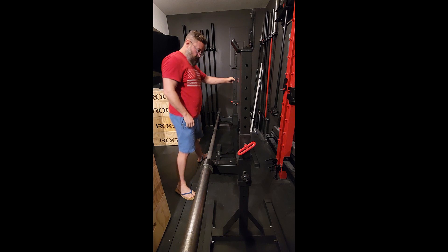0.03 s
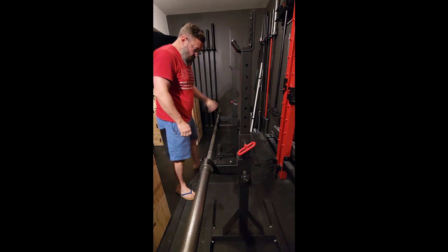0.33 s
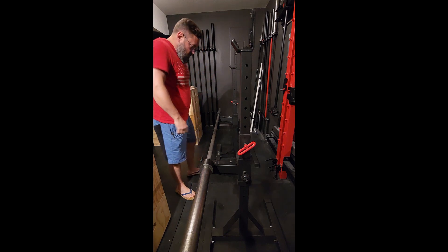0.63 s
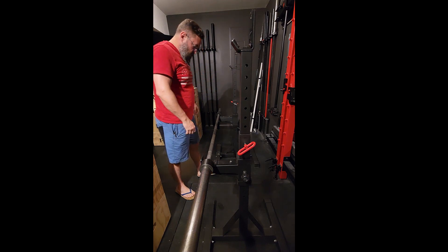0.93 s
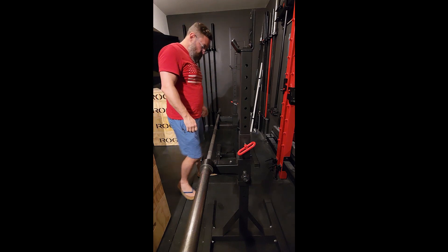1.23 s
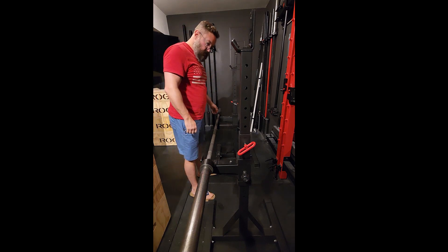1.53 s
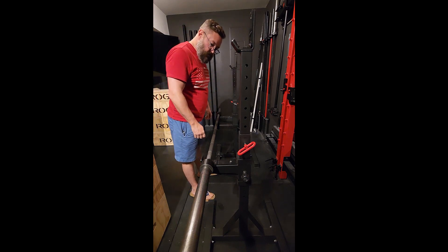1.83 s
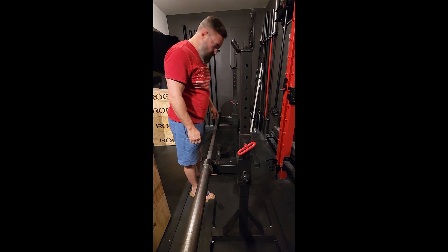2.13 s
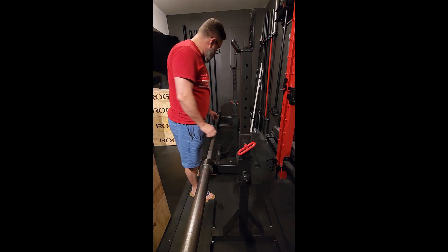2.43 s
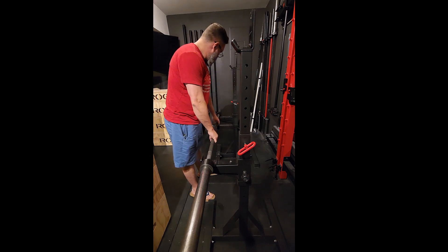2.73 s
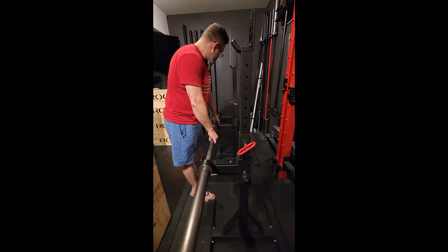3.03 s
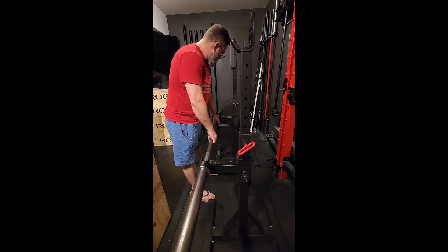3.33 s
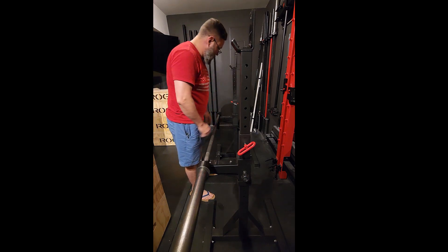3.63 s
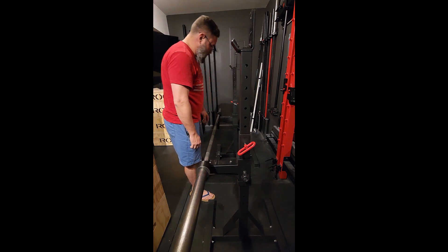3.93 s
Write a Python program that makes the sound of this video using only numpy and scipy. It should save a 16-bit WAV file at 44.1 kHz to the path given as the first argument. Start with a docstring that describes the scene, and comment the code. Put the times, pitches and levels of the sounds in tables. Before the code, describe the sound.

A few steps in flip-flops thud softly across a small gym room, then one sole claps down near the microphone with a hollow pop. Afterwards clothes rustle faintly and a hand barely brushes a barbell, while ventilation hums throughout.

```python
"""Flip-flops in a home gym

A few steps on rubber mats in a small, hard-walled room. The soles pad, scuff and squeak faintly, and the
floor thuds under the weight. One lands flat, a little right of the microphones: trapped air pops, the
edge cracks and the walls answer. Clothes rustle and a hand brushes the barbell.
Ventilation hums and rumbles in the background throughout."""
import sys
import numpy as np
from scipy import signal
from scipy.fft import rfft, irfft
from scipy.io import wavfile

SR = 44100
rng = np.random.default_rng(int(sys.argv[2]) if len(sys.argv) > 2 else 0)


def store_pcm(level_fs):
    """Save levels as 16-bit WAV."""
    pcm = np.round(np.clip(level_fs, -1, 1) * 32767).astype(np.int16)
    wavfile.write(sys.argv[1], SR, np.atleast_2d(pcm).T)


N = 176400
T = np.arange(N) / SR

# Likeness of the left and right microphones in the room: frequency_hz, correlation
STEREO_LIKENESS = [(60, 0.99), (130, 0.95), (290, 0.8), (600, 0.47), (1100, 0), (3000, 0.018), (15000, 0)]
# Decay of the room: frequency_hz, t60_s
ROOM_DECAY = [(100, 0.17), (400, 0.38), (1000, 0.53), (2500, 0.4), (6000, 0.49), (14000, 0.27)]
# Standing waves between the walls: pitch_hz, level_db, t60_s
ROOM_MODES = [(398, -29.5, 0.3), (473, -27, 0.33), (594, -30, 0.35), (678, -34, 0.31), (774, -45, 0.35),
              (804, -45, 0.33), (1151, -37, 0.25), (1281, -39, 0.31)]
ROOM_GAP_S, ROOM_BUILD_S = 0.0069, 0.0017

# Spectrum of the ventilation's air hiss: frequency_hz, relative_db
AIR_COLOUR = [(100, -11.5), (160, -5.5), (190, -9.5), (240, -5), (290, -6.5), (350, -10.5), (555, -12.5),
              (740, -17.5), (950, -17.5), (1350, -16), (2160, -20), (2930, -26.5), (4100, -30),
              (5200, -36.5), (6900, -40.5), (7350, -38.5), (8400, -42.5), (9950, -50), (10750, -44.5),
              (11500, -49.5), (13000, -50.5), (15500, -53)]
# Spectrum of the duct rumble: frequency_hz, relative_db
RUMBLE_COLOUR = [(15, -29), (25, -10), (36, -1), (50, 8.5), (67, 4.5), (80, 6), (92, -1.5), (110, -2),
                 (140, -2), (175, -12.5), (260, -70), (1000, -100)]
# Motor tones: pitch_hz, level_db, waver_share
MOTOR_TONES = [(119.63, -42.5, 0.26), (68.33, -42, 0.75), (221.2, -55.5, 1), (261.5, -54, 0.79),
               (487.6, -61.5, 0.98), (1295, -64.5, 0.89)]

# Touches of the hand on the barbell: start_s, level_db
BAR_TOUCHES = [(2.92, -66), (3.52, -69)]
# Brushes of cloth: start_s, length_s, level_db
RUSTLES = [(0.027, 0.35, -63), (0.245, 0.16, -56.5), (0.336, 0.28, -56.5), (0.944, 0.044, -63),
           (1.364, 0.17, -64.5), (2.837, 0.077, -63.5), (2.94, 0.13, -64.5), (3.208, .17, -65.5),
           (3.477, 0.12, -69), (3.904, 0.089, -62)]
# Spectrum of the cloth: frequency_hz, relative_db
CLOTH_COLOUR = [(300, -17), (1500, 6.5), (4000, -2.5), (8000, -9.5), (11000, -16.5), (15000, -17)]

# Rubber squeaks underfoot: start_s, length_s, level_db, pitch_hz
SQUEAKS = [(0.252, 0.035, -45.5, 2120), (0.373, 0.017, -43.5, 2570), (0.406, 0.06, -53, 2560),
           (0.49, 0.052, -55, 2570), (0.604, 0.028, -44, 2260), (1.065, 0.022, -42, 2550)]
# Weight coming onto the floor: start_s, level_db
THUDS = [(0.305, -27), (0.699, -24.5), (1.121, -34), (1.609, -27), (1.952, -33)]
# Drags of a sole over the mat: start_s, length_s, level_db, swell_db, cutoff_hz
SCUFFS = [(0.001, 0.0275, -50, -4, 4140), (0.594, 0.074, -50, 10.5, 14000),
          (1.603, 0.034, -49.5, 8.5, 9100)]
# Spectrum of the dragging: frequency_hz, relative_db
SCUFF_COLOUR = [(200, -21), (500, 0), (1000, -6), (2200, 3), (2700, -2.5), (3300, 0), (4400, -2),
                (5200, -9), (6300, -4.5), (7800, -4.5), (9500, -10), (15000, -9.5)]
# Soft sole contacts: start_s, level_db, fall_s, cutoff_hz, tap_over_puff_db, rise_s
PADS = [(0.001, -33, 0.01, 3950, 15, 0.0013), (0.228, -31.5, 0.0061, 1950, 12, 0.00085),
        (0.264, -40, 0.013, 2400, 9, .003), (0.304, -38.5, 0.0044, 1490, 14, 0.00086),
        (0.32, -36.5, 0.0033, 1800, 18, 0.0009), (0.368, -44.5, 0.017, 2240, 12, .003),
        (0.455, -43.5, 0.031, 2620, 12, 0.0022), (1.053, -34, 0.018, 3120, -5, 0.0051),
        (1.088, -40, 0.0041, 2000, 22, 0.0012), (1.607, -35.5, 0.02, 1670, 14, 0.0012)]
# Spectrum of the soft contacts: frequency_hz, relative_db
PAD_COLOUR = [(100, -27), (350, 1.5), (600, 2.5), (850, -1.5), (1400, 0.5), (2200, 1), (4000, -7.5),
              (8000, -10), (15000, -15)]

# Modes of the air trapped under the flat sole: pitch_hz, level_db, t60_s
AIR_POCKET_MODES = [(412, -14, 0.04), (481, -9, 0.02), (610, -41, 0.0085)]
# Spectrum of the whole sole's clap: frequency_hz, relative_db
CLAP_COLOUR = [(300, -14), (620, 7), (820, 5.5), (960, -2), (1300, 1.5), (1800, 3.5), (2200, 0.5),
               (2700, -8), (4200, -15), (5500, -22), (8000, -27), (15000, -31)]
# Spectrum of the crack at the sole's edge: frequency_hz, relative_db
CRACK_COLOUR = [(400, -10), (800, -5), (1200, 7), (2500, -3), (4500, -14), (8000, -23), (15000, -40)]
LANDING_S = 1.6405


def from_db(db):
    """Decibels to gain."""
    return 10 ** (np.asarray(db) / 20)


def unit_rms(x):
    """Scale to rms 1."""
    return x / np.sqrt(np.mean(x ** 2) + 1e-20)


def at_hz(table, hz):
    """Read a table on a log-frequency axis."""
    frequencies, values = np.transpose(table)
    return np.interp(np.log(np.maximum(hz, 1)), np.log(frequencies), values)


def butter(x, hz, kind, order=2):
    """Causal low- or high-pass."""
    sections = signal.butter(order, min(hz, .47 * SR), kind, fs=SR, output="sos")
    return signal.sosfilt(sections, x + 1e-18)


def noise(colour):
    """Mono noise of a given colour, rms 1."""
    hz = np.arange(N // 2 + 1) * SR / N
    return unit_rms(irfft(rfft(rng.standard_normal(N)) * from_db(at_hz(colour, hz)), N))


def drift(rate_hz):
    """Random wander, mostly slower than rate_hz, rms 1."""
    hz = np.arange(N // 2 + 1) * SR / N
    return unit_rms(irfft(rfft(rng.standard_normal(N)) / (1 + (hz / rate_hz) ** 2), N))


def grainy_noise(colour, rough_db, rate_hz):
    """Coloured noise whose level flickers, rms 1."""
    return unit_rms(noise(colour) * from_db(rough_db * drift(rate_hz)))


def pulse(start, colour):
    """One minimum-phase click of a given colour, peak 1."""
    cepstrum = irfft(np.log(from_db(at_hz(colour, np.arange(SR // 2 + 1)))), SR)
    causal_fold = np.r_[1, np.full(SR // 2 - 1, 2), np.zeros(SR - SR // 2)]
    click = irfft(np.exp(rfft(cepstrum * causal_fold)), SR)
    return np.r_[np.zeros(int(start * SR)), click / np.abs(click).max(), np.zeros(N)][:N]


def ring(start, hz, t60_s):
    """A struck, damped sine."""
    age = np.maximum(T - start, 0)
    return np.sin(2 * np.pi * hz * age) * np.exp(-np.minimum(np.log(1000) * age / t60_s, 40))


def ramp(start, rise_s):
    """A straight rise from 0 to 1."""
    return np.clip((T - start) / rise_s, 0, 1)


def burst(start, rise_s, fall_s):
    """Quick rise, exponential fall."""
    return ramp(start, rise_s) * np.exp(-np.clip((T - start) / fall_s, 0, 40))


def arch(start, length):
    """A smooth swell and fade."""
    return np.sin(np.pi * np.clip((T - start) / length, 0, 1))


def diffuse(mid, side):
    """Two unrelated signals become a stereo field, alike at both microphones in the bass."""
    n = len(mid)
    alike = at_hz(STEREO_LIKENESS, np.arange(n // 2 + 1) * SR / n)
    return irfft(np.sqrt(1 + alike) * rfft(mid) + np.sqrt(1 - alike) * rfft(side) * [[1], [-1]], n)


def room_response():
    """Dense reflections off near, hard walls build up, then die band by band."""
    t, hz = T[:SR], np.arange(SR // 2 + 1)
    field = rfft(diffuse(*rng.standard_normal((2, SR))))
    build = np.clip((t - ROOM_GAP_S) / ROOM_BUILD_S, 0, 1)
    edges, out = np.r_[0, np.geomspace(100, SR / 2, 24)], 0
    for low, high in zip(edges, edges[1:]):
        decay = from_db(-60 * t / at_hz(ROOM_DECAY, (low + high) / 2))
        band = irfft(field * ((hz >= low) & (hz < high)), SR) * build * decay
        energy_share = (high - low) / (SR / 2)  # keeps the colour even
        out = out + band * np.sqrt(energy_share / np.sum(band ** 2, axis=1, keepdims=True))
    return out


def reflections(x, room):
    """What the walls send back to the microphones."""
    return signal.fftconvolve(x[None], room, axes=1)[:, :N]


def in_room(x, room, walls_db):
    """Direct sound in the centre, reflections around it."""
    return x + from_db(walls_db) * reflections(x, room)


def from_right(x, lag_s=0.00021):
    """Sound from the right reaches the left microphone a moment later."""
    return np.array([np.interp(T - lag_s, T, x), x])


def ventilation(hiss_db=-44.5, rumble_db=-40, waver_hz=6.1):
    """Room tone: air hiss, duct rumble and wavering motor tones."""
    hiss = from_db(hiss_db) * unit_rms(diffuse(noise(AIR_COLOUR), noise(AIR_COLOUR)))
    rumble = from_db(rumble_db) * unit_rms(diffuse(noise(RUMBLE_COLOUR), noise(RUMBLE_COLOUR)))
    hum = 0
    for hz, db, waver in MOTOR_TONES:
        swing = 1 - waver + waver * (drift(waver_hz) + 1j * drift(waver_hz)) / 2  # in level and phase
        tone = np.exp(2j * np.pi * (hz * T + rng.random()))
        hum = hum + from_db(db) * unit_rms(np.real(swing * tone))
    return hiss + rumble + hum


def barbell():
    """The steel bar sings faintly where the hand brushes it."""
    return sum(from_db(db) * ring(start, hz=3380, t60_s=2.7) * ramp(start, rise_s=.05)
               for start, db in BAR_TOUCHES)


def cloth():
    """Faint, grainy brushing of shirt and shorts."""
    grain = grainy_noise(CLOTH_COLOUR, rough_db=3, rate_hz=60)
    return grain * sum(from_db(db) * arch(start, length) for start, length, db in RUSTLES)


def squeaks(pitch_waver=0.021):
    """Rubber sticks and slips in thin, slightly unsteady tones."""
    wavering_time = np.cumsum(1 + pitch_waver * drift(rate_hz=119)) / SR
    return sum(from_db(db) * arch(start, length) * np.sin(2 * np.pi * hz * wavering_time)
               for start, length, db, hz in SQUEAKS)


def thuds():
    """The floor gives under each shift of weight."""
    return sum(from_db(db) * ring(start, hz=80, t60_s=0.097) for start, db in THUDS)


def scuffs(edge_s=0.0018):
    """A sole drags on the mat: friction hiss starts at once, then swells or dips in mid-stroke."""
    grain, out = grainy_noise(SCUFF_COLOUR, rough_db=3.5, rate_hz=400), 0
    for start, length, db, swell_db, cutoff_hz in SCUFFS:
        contact = np.clip(np.minimum(T - start, start + length - T) / edge_s, 0, 1)
        level = from_db(db + swell_db * arch(start, length))
        out = out + butter(grain * contact * level, cutoff_hz, "low")
    return out


def pads():
    """Foam soles meet the mat with a tap and a short, grainy puff."""
    grain, out = grainy_noise(PAD_COLOUR, rough_db=1, rate_hz=200), 0
    for start, db, fall_s, cutoff_hz, tap_db, rise_s in PADS:
        tap = from_db(tap_db) * pulse(start, PAD_COLOUR)
        puff = grain * burst(start, rise_s, fall_s)
        out = out + from_db(db) * butter(tap + puff, cutoff_hz, "low")
    return out


def standing_waves(build_s=0.035, spread_rad=0.64):
    """The landing sets room resonances ringing, each with its own phase at either microphone."""
    age, out = np.maximum(T - LANDING_S - ROOM_GAP_S, 0), 0
    for hz, db, t60_s in ROOM_MODES:
        phase = 2 * np.pi * rng.random() + spread_rad * rng.choice([-1, 1]) * np.array([[1], [-1]])
        out = out + from_db(db - 60 * age / t60_s) * np.sin(2 * np.pi * hz * age + phase)
    return out * np.minimum(age / build_s, 1)


def air_pop():
    """Air trapped under the flat sole rings with a hollow pop."""
    modes = sum(from_db(db) * ring(LANDING_S, hz, t60_s) for hz, db, t60_s in AIR_POCKET_MODES)
    return butter(modes * ramp(LANDING_S, rise_s=0.0014), hz=290, kind="high")


def sole_clap(peak_db=-16.5):
    """The whole sole meets the mat at once."""
    return from_db(peak_db) * pulse(LANDING_S, CLAP_COLOUR)


def edge_crack(peak_db=-15.5):
    """The sole's edge snaps shut: a few milliseconds of bright noise, aimed at the microphones."""
    snap = noise(CRACK_COLOUR) * burst(LANDING_S, rise_s=.0004, fall_s=.003)
    return from_db(peak_db) * snap / np.abs(snap).max()


def flat_landing(room, pop_walls_db=-2, clap_walls_db=12.5):
    """The flat footfall: pop and crack sound close, while the clap arrives mostly off the walls."""
    pop, clap = air_pop(), sole_clap()
    direct = from_right(pop + clap + edge_crack())
    walls = reflections(from_db(pop_walls_db) * pop + from_db(clap_walls_db) * clap, room)
    return direct + walls + standing_waves()


def scene():
    """Feet, clothes and barbell, heard from inside the gym over the ventilation."""
    room = room_response()
    steps = in_room(pads(), room, walls_db=6.5) + in_room(scuffs(), room, walls_db=7) + thuds()
    faint = in_room(squeaks(), room, walls_db=0) + in_room(cloth(), room, walls_db=4.5) + barbell()
    return flat_landing(room) + steps + faint + ventilation()


def record(dry):
    """The microphone signal is cut steeply above 15.6 kHz."""
    return signal.sosfilt(signal.ellip(12, .1, 90, 15600, fs=SR, output="sos"), dry)


dry = scene()
out = record(dry)
store_pcm(out)
```